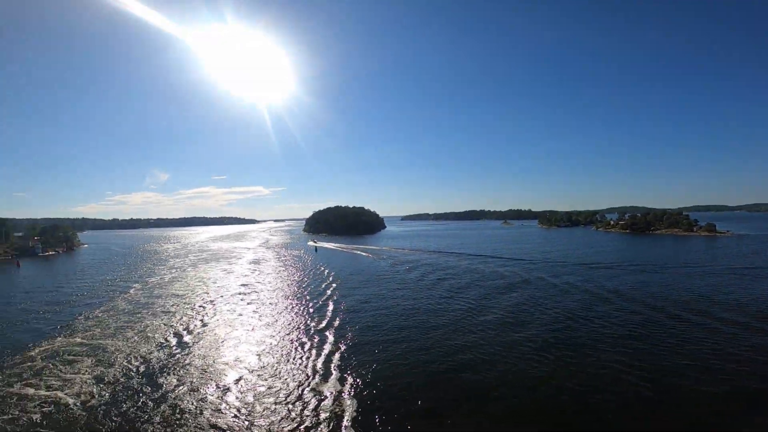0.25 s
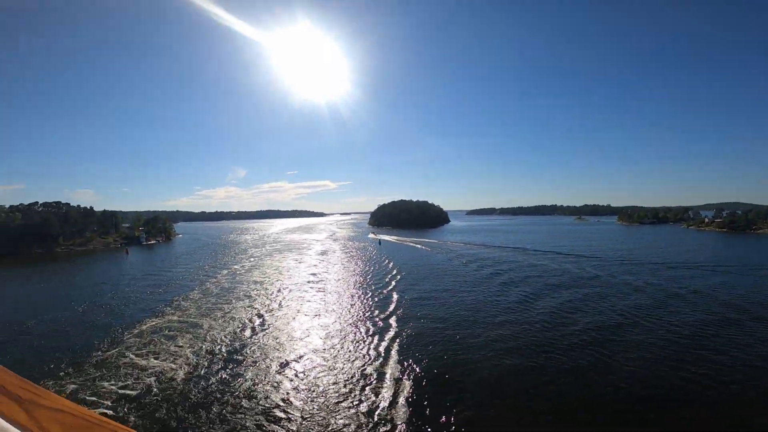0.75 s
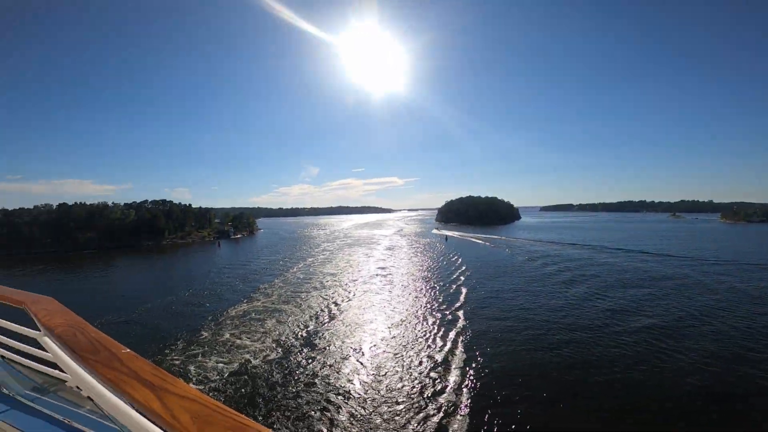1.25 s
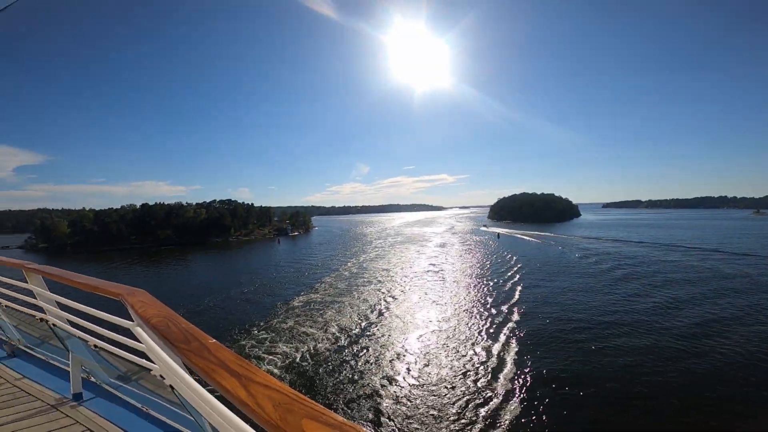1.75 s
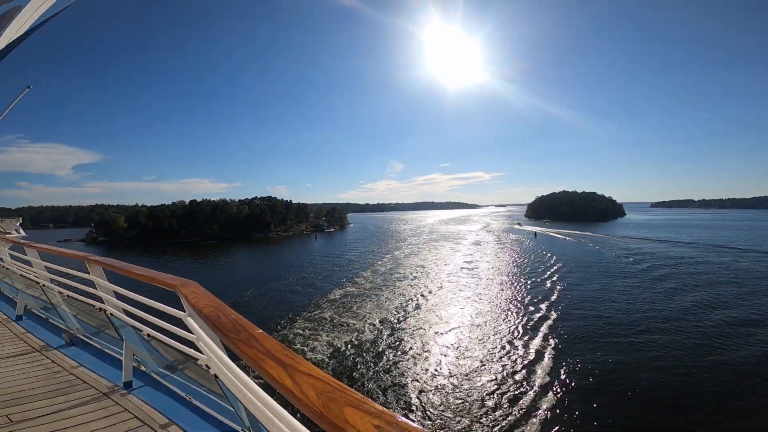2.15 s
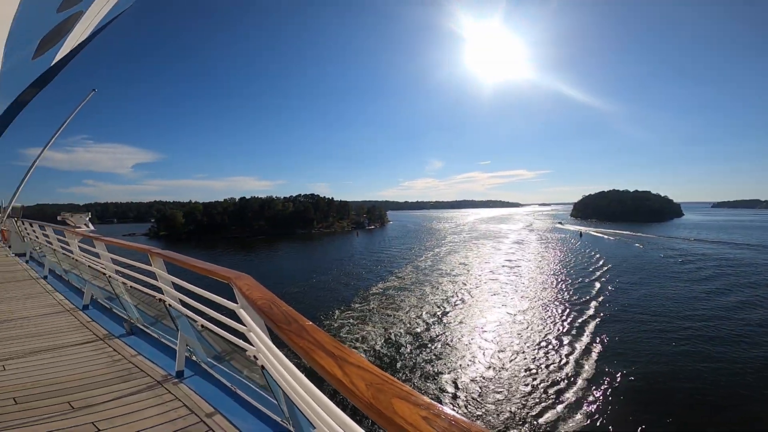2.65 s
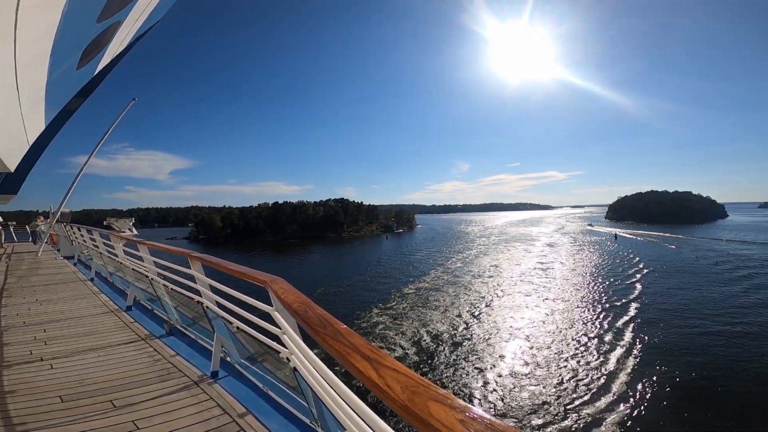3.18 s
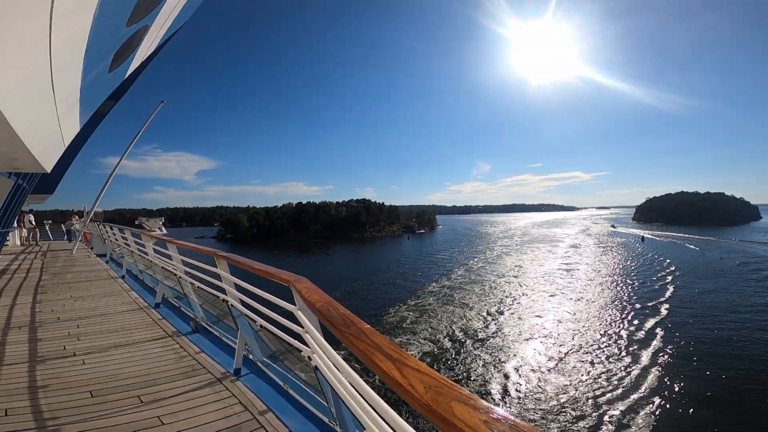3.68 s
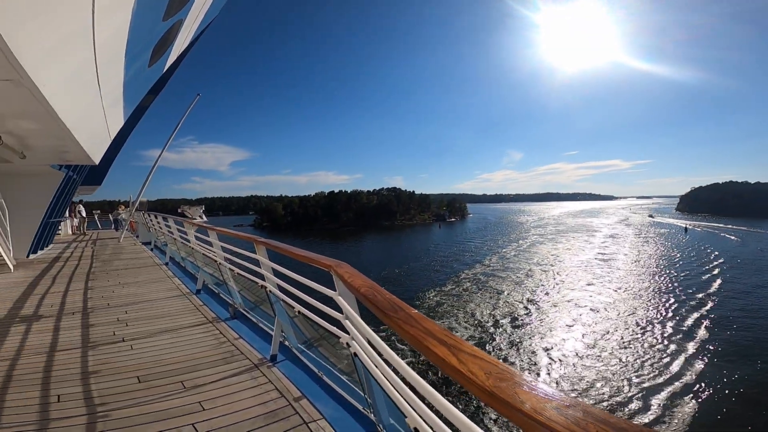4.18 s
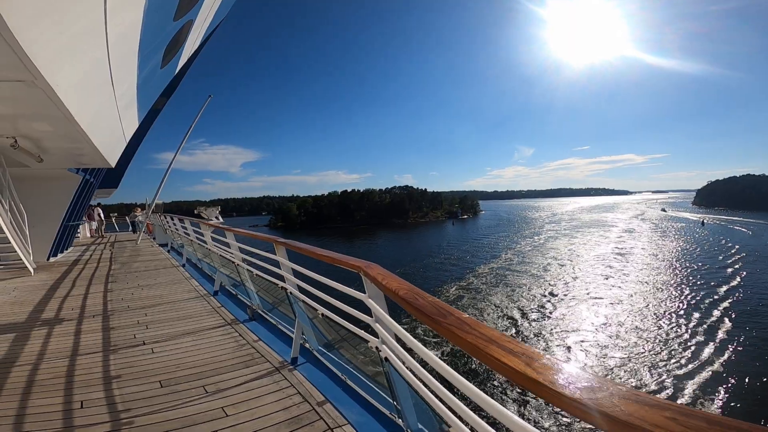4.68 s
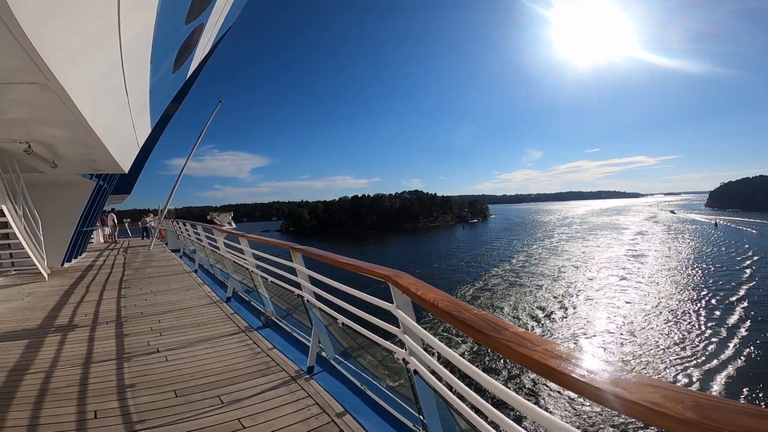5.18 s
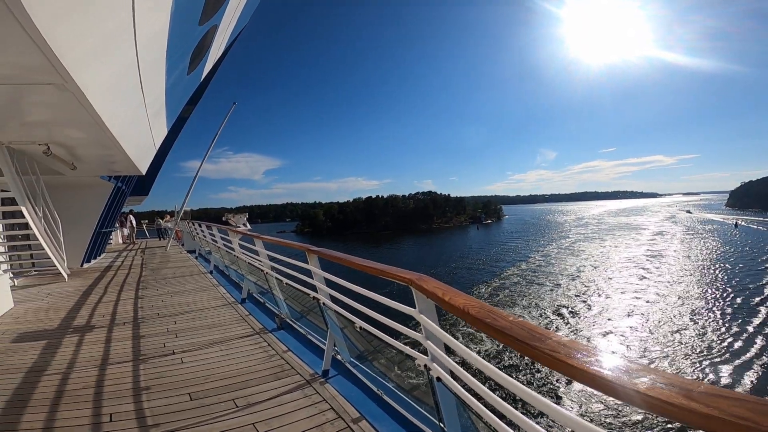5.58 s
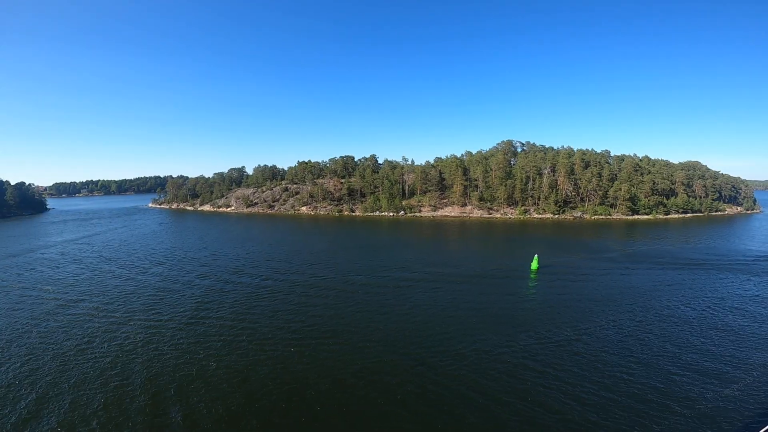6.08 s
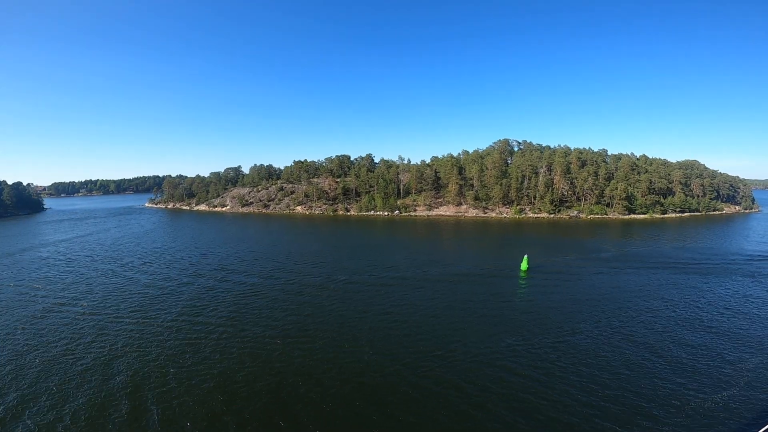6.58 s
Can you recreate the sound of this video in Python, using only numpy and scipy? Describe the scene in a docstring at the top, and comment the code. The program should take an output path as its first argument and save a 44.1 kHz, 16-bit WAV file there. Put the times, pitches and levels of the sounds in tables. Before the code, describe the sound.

Low, beating ship rumble under hissing wake and early wind thumps; after a short gap, a narrower, humming deck sound fades in.

```python
"""The open deck of a ship under way, heard from two places.
At the first, engines throb through the hull as a beating rumble and a wavering tone with a fainter drone.
A fan and a generator hum as steady tones, the wake rushes as filtered noise, and wind buffets the two ports.
After a short silence the second place fades in, in mono: nearer the generator and without the fan.
Brief soft hoots are heard at both places, and a faint double tick soon after the second begins."""
import sys
import numpy as np
from scipy import signal
from scipy.fft import rfft, irfft, next_fast_len
from scipy.io import wavfile
from scipy.ndimage import uniform_filter1d, minimum_filter1d

SR = 44100
rng = np.random.default_rng(int(sys.argv[2]) if len(sys.argv) > 2 else 0)


def dump(signal):
    """Clip the signal to [-1, 1] and save it as 16-bit WAV at the path in sys.argv[1]."""
    limited = np.clip(np.atleast_2d(signal).T, -1, 1)
    pcm = np.round(limited * 32767).astype(np.int16)
    wavfile.write(sys.argv[1], SR, pcm)


N = 301711

CUT_S, RESUME_S = 5.671, 5.889  # end of the first place, start of the second
SIZE = next_fast_len(N)
TIME = np.arange(N) / SR
HZ = np.maximum(np.arange(SIZE // 2 + 1) * SR / SIZE, 1)
AT_FIRST = TIME < RESUME_S


def from_db(db):
    """Turns decibels into gain."""
    return 10 ** (np.asarray(db) / 20)


def rms_one(x):
    """Scales a sound to rms 1."""
    return x / np.sqrt(np.mean(x ** 2) + 1e-20)


def in_time(places):
    """Joins the tables of both places and reads their columns at every sample."""
    s, *columns = np.vstack(places).T
    return [np.interp(TIME, s, column) for column in columns]


def at_hz(points):
    """Reads a (f/Hz, value) table at every spectral bin, on a logarithmic frequency scale."""
    hz, value = np.transpose(points)
    return np.interp(np.log(HZ), np.log(np.maximum(hz, 1)), value)


def drift(rate_hz):
    """Slow chance with spread 1: noise at every 40th sample, smoothed twice by a one-pole low-pass."""
    r = np.exp(-2 * np.pi * rate_hz * 40 / SR)
    noise = rng.standard_normal(N // 40 + 2002)
    slow = signal.lfilter([1], [1, -2 * r, r * r], noise)[2000:]  # drop the filter's start-up
    return np.interp(np.arange(N) / 40, np.arange(len(slow)), rms_one(slow))


def wavering(hz, wander_hz, rate_hz):
    """A sine of rms 1 whose pitch wanders at random around hz."""
    cycles = np.cumsum(hz + wander_hz * drift(rate_hz)) / SR
    return np.sqrt(2) * np.sin(2 * np.pi * (cycles + rng.random()))


def rush(spectrum, patchy_db, tilt_db=0):
    """Stereo noise of rms 1 in overlapping octave bands, each swelling partly together, partly alone."""
    # how alike left and right are: f/Hz, shared part of the power (0-1)
    likeness = [(60, 1), (100, 1), (170, 0.95), (280, 1), (460, 1), (770, 0.92), (1290, 1), (2140, 0.77),
                (3570, 0.72), (5000, 0.27), (5800, 0.79), (7500, .9), (9930, 0.94), (12000, 0.7)]
    # how far left runs ahead of right, minus = behind: f/Hz, phase/radians
    left_lead = [(60, 0.67), (300, -0.32), (780, -0.57), (1700, -0.66), (3450, -0.67), (5340, -0.59),
                 (5800, -0.1), (10100, 0.05)]
    # how much louder left is than right: f/Hz, difference/dB
    left_over_right = [(30, 1), (70, -0.5), (170, 1), (460, 2.5), (1290, 2.0), (3570, 3.5), (9930, -0.5)]
    common, left, right = rfft(rng.standard_normal((3, SIZE)))
    alike = np.clip(at_hz(likeness), 0, 1)
    pair = np.sqrt(alike) * common + np.sqrt(1 - alike) * np.array([left, right])
    # half the difference goes to each side
    turn = from_db(at_hz(left_over_right) / 2) * np.exp(.5j * at_hz(left_lead))
    pair = pair * from_db(at_hz(spectrum)) * np.array([turn, 1 / turn])
    together = drift(3.5)
    octave = np.log2(np.clip(HZ, 62.5, 8000) / 62.5)
    out = 0
    for band in range(8):
        window = np.clip(1 - abs(octave - band), 0, 1)
        swell_db = patchy_db * (0.29 * together + drift(16.0))
        gain = from_db(swell_db + tilt_db * (band - 3.5))
        out = out + gain * irfft(pair * window, SIZE)[:, :N]
    return rms_one(out)


def wake():
    """The rush of wake and air: low hull roar and higher hiss, coloured differently at the two places."""
    # one table per place: t/s, hull roar/dB (before 7 dB are added), hiss/dB, hiss brightening/(dB per octave)
    rush_levels = [
        [(0.0, -32.5, -41.5, 0), (.1, -35, -44.5, 0.9), (0.48, -34.5, -40.5, 0.14), (.75, -32.5, -43.5, 1.35),
         (1.3, -34, -42.5, 0.5), (1.65, -33, -42.5, 0.37), (2.05, -35, -41.5, 0.2), (2.8, -36, -43.5, 0.4),
         (3.2, -35, -43, 0), (4.0, -37, -43.5, 0.6), (4.3, -33.5, -41.5, 0.3), (4.56, -36, -43, 0.27),
         (5.2, -37, -43, 0.03), (5.66, -36, -43.5, -0.5)],
        [(5.93, -32, -44.5, -0.5), (6.03, -27.5, -40.5, -0.8), (6.08, -31, -40.5, -1), (6.14, -30, -40.5, -0.8),
         (6.26, -28, -40, -0.5), (6.4, -29, -42, 0), (6.5, -30, -42, -0.1), (6.55, -28, -43, 0.3),
         (6.84, -30, -44.5, -0.4)],
    ]
    # colour of the roar, one table per place: f/Hz, relative level/(dB per Hz)
    roar_colours = [
        [(12, -20.5), (25, -7), (50, 1), (63, 7.5), (86, 8), (99, -2), (112, -3), (132, -4), (160, -5.5),
         (210, -13), (232, -12), (245, -9), (262, -13), (320, -15.5), (333, -16.5), (348, -16.5), (460, -31),
         (700, -68), (3000, -120)],
        [(12, -11), (28, 11), (45, 9.5), (58, 10.5), (90, 8), (102, 1.5), (125, 3.5), (145, 1.5), (200, -4.5),
         (310, -13), (360, -12), (388, -6), (412, -12), (470, -14), (700, -77), (3000, -120)],
    ]
    # colour of the hiss, one table per place: f/Hz, relative level/(dB per Hz)
    hiss_colours = [
        [(200, -18), (350, -2.5), (450, -0.5), (700, -1.5), (870, -3.5), (915, -0.5), (1100, -3), (1600, -5.5),
         (2700, -10.5), (4500, -18), (7800, -30.5), (8800, -30.5), (10200, -37), (10800, -46), (12500, -46.5),
         (14000, -58), (15200, -74), (16000, -87.5)],
        [(200, -19), (350, -9.5), (470, -3.5), (700, -3), (850, -6.5), (1130, -8.5), (1400, -11), (1600, -13),
         (1900, -15.5), (3500, -22.5), (6000, -32.5), (10200, -49), (11200, -58), (16000, -84)],
    ]
    roar_db, hiss_db, tilt_db = in_time(rush_levels)
    roar_db = roar_db + 1 * drift(2.5) * AT_FIRST  # random swells of about 1 dB, first place only
    places = []
    for roar_colour, hiss_colour in zip(roar_colours, hiss_colours):
        roar = from_db(roar_db + 7.0) * rush(roar_colour, patchy_db=0.77)
        hiss = from_db(hiss_db) * rush(hiss_colour, patchy_db=0.8, tilt_db=tilt_db)
        places.append(roar + hiss)
    return np.where(AT_FIRST, *places)


def hoots_and_ticks():
    """Soft bell-shaped tones with gliding pitch, and two very short clicks of opposite sign."""
    # soft hoots, perhaps wind across the railing: middle t/s, f/Hz, peak level/dB, length/s, glide/(Hz per s)
    hoots = [(3.672, 538.2, -43.5, 0.066, -48), (5.265, 712, -45.5, 0.14, 27),
             (5.992, 922, -46.5, .07, -200), (6.158, 664, -46, 0.07, 49), (6.175, 705, -41, 0.07, -54),
             (6.191, 505.2, -41, 0.065, 301), (6.474, 557, -40, .1, -100)]
    # a faint double tick: t/s, peak level/dB
    ticks = [(6.053, -29.5), (6.0547, -35)]
    out = np.zeros(N)
    for s, hz, db, length_s, glide in hoots:
        t = TIME - s
        bell = np.exp(-(2 * t / length_s) ** 2)
        out += from_db(db) * bell * np.sin(2 * np.pi * (hz + glide * t / 2) * t)
    step = np.arange(12)
    for sign, (s, peak_db) in zip((1, -1), ticks):
        out[round(s * SR) + step] += sign * from_db(peak_db - 4.5 * step)  # fades 4.5 dB per sample
    return out


def wind():
    """Puffs of wind: each port makes its own low turbulence, which every puff lets through for a moment."""
    # the strongest puffs: middle t/s, level/dB (before 6 dB are added), share of power on the left port (0-1)
    strong = [(0.314, -24.5, 0.7), (0.433, -26, 0.3), (0.624, -28, 0), (0.748, -28.5, 0.51),
              (0.98, -36.5, 0.7), (1.085, -28.5, 0.6), (1.21, -35, 0.58), (1.342, -29, 0.9),
              (1.472, -29, 0.6), (1.62, -33, .5), (1.78, -32, 0.54), (1.88, -35.5, 0.6), (2.3, -38, 0.6),
              (2.44, -34, 0.41), (2.87, -33, 0.54), (2.97, -39.5, 0.5), (3.317, -39, 0.69),
              (3.83, -42, 0.54), (3.953, -35, 0.55), (4.102, -32, 0.6), (4.232, -28, 0.54),
              (5.02, -36, 0.48), (5.6, -43.5, .5)]
    # colour of the turbulence: f/Hz, relative level/(dB per Hz)
    puff_colour = [(12, -9), (25, 9.5), (45, 12.5), (80, 2), (100, 2.5), (140, 1.5), (280, -11.5),
                   (400, -24), (480, -20), (900, -65), (3000, -120)]
    puff_s = 0.043
    noise = rfft(rng.standard_normal((2, SIZE)))
    turbulence = rms_one(irfft(from_db(at_hz(puff_colour)) * noise, SIZE)[:, :N])
    # 22 weaker puffs at random moments of the first place, same columns
    weak = [(when * CUT_S, -43 - 0.5 * (4 * how - 2), left / 2 + 0.2)
            for when, how, left in rng.random(size=(22, 3))]
    power = np.zeros((2, N))
    for s, level_db, left in list(strong) + weak:
        share = np.clip([[left], [1 - left]], 0, 1)
        power += share * from_db(2 * level_db) * np.exp(-(2 * (TIME - s) / puff_s) ** 2)
    return from_db(6.0) * np.sqrt(power) * turbulence


def fan_and_generator():
    """Two steady machine tones with slightly wandering pitch and level; the fan only at the first place."""
    # one table per place: t/s, fan/dB, generator/dB
    hum_levels = [
        [(0.0, -41.5, -50.5), (.5, -37, -49), (.75, -40, -51.5), (1.35, -35.5, -51), (2.2, -38.5, -51),
         (2.5, -44.5, -52), (2.93, -40.5, -53.5), (3.7, -43, -50), (4.03, -39, -50), (4.3, -44.5, -55.5),
         (4.7, -39, -54), (5.1, -45, -50.5), (5.3, -48, -59.5), (5.66, -46.5, -49.5)],
        [(5.96, -45, -37.5), (6.15, -45, -35.5), (6.3, -45, -35), (6.45, -46, -34.5), (6.84, -45, -34)],
    ]
    fan_db, generator_db = in_time(hum_levels)
    fan = from_db(fan_db + 1 * drift(1.2)) * wavering(177.9, 0.25, 2.0) * AT_FIRST
    flicker_db = np.where(AT_FIRST, 1.2, 0)  # the generator's level flickers only at the first place
    generator = from_db(generator_db + flicker_db * drift(10.0)) * wavering(398.9, 0.16, 4.1)
    return fan, generator


def swelling(swells, between_db, wander_hz):
    """A wandering tone that glides in pitch from swell to swell and sinks in level between them."""
    edge_s, flicker_db = 0.087, 1.5
    s, length_s, hz, level_db = np.transpose(swells)[:, :, None]
    past_edge = 4 * (abs(TIME - s) - length_s / 2) / edge_s
    shape = 1 / (1 + np.exp(np.clip(past_edge, -30, 30)))
    gain = from_db(between_db) + np.sum(from_db(level_db) * shape, axis=0)
    pitch = np.interp(TIME, s[:, 0], hz[:, 0])
    return gain * from_db(flicker_db * drift(9.8)) * wavering(pitch, wander_hz, 10.8)


def hull_rumble():
    """A wandering low tone that beats against weaker neighbours, with its loudness partly evened out."""
    # one table per place: t/s, level/dB
    rumble_levels = [
        [(0.0, -27.5), (0.09, -18.5), (0.44, -20), (1.58, -20), (1.61, -33), (1.87, -15.5), (1.97, -21),
         (2.24, -22.5), (2.27, -14.5), (2.68, -21.5), (2.73, -26), (2.81, -9), (2.88, -31.5), (2.98, -13),
         (3.15, -22), (3.2, -17.5), (3.45, -24.5), (3.48, -15), (3.55, -22.5), (4.27, -17.5), (4.46, -21),
         (4.65, -13), (4.7, -23), (4.96, -16), (5.0, -25), (5.14, -12.5), (5.22, -24), (5.34, -14.5),
         (5.63, -23.5), (5.66, -42.5)],
        [(5.96, -26), (6.02, -21), (6.08, -29.5), (6.19, -22), (6.29, -26), (6.35, -28), (6.4, -23),
         (6.44, -29), (6.53, -22.5), (6.67, -26), (6.74, -19.5), (6.79, -32), (6.84, -12)],
    ]
    # one table per place: t/s, f/Hz
    rumble_pitch = [
        [(0.0, 38.87), (0.36, 36.74), (0.72, 40.8), (0.85, 36.2), (0.98, 39.9), (1.32, 38.3), (1.42, 44.65),
         (1.62, 41.96), (1.72, 35.3), (1.86, 37.94), (2.03, 30.05), (2.22, 38.82), (2.79, 42.27), (3.39, 34.05),
         (3.62, 34.68), (3.77, 29.9), (4.0, 30.2), (4.11, 34.13), (4.59, 34.64), (4.73, 38.76), (5.01, 35),
         (5.66, 38.84)],
        [(5.96, 33.15), (6.06, 33.22), (6.088, 32.55), (6.146, 31.3), (6.174, 30.6), (6.386, 30.7),
         (6.468, 28.93), (6.732, 29.07), (6.812, 27.48), (6.83, 27.6)],
    ]
    # weaker tones around it: f/Hz, level beside the main tone/dB at the first place, same/dB at the second
    neighbours = [(44.63, -5.5, -15), (34.7, -6.5, -16.5), (26.86, -4.5, -9)]
    rumble_db, = in_time(rumble_levels)
    rumble_hz, = in_time(rumble_pitch)
    beating = wavering(rumble_hz, 1.24, 9.4)
    for hz, first_db, second_db in neighbours:
        beating = beating + from_db(np.where(AT_FIRST, first_db, second_db)) * wavering(hz, 2.2, 6.63)
    beat_depth = 0.1  # the more, the deeper the rumble beats
    evened = beating / np.sqrt(uniform_filter1d(beating ** 2, size=SR // 14) + beat_depth)
    return from_db(rumble_db) * rms_one(evened)


def engines():
    """Engine throb through the hull (rumble, tone and drone) with the two machine hums, placed in stereo."""
    # swells of the engine tone: middle t/s, length/s, f/Hz, level/dB
    tone_swells = [(0.114, 0.11, 72, -27), (0.6, 0.23, 72.62, -25.5), (1.05, 0.5, 72.9, -26),
                   (1.748, 0.14, 73.25, -23), (2.069, 0.34, 74.12, -22), (2.638, 0.31, 73.54, -21.5),
                   (3.326, 0.23, 74.2, -18), (3.761, 0.27, 72.8, -18), (4.188, 0.16, 73.8, -29),
                   (4.447, 0.26, 76.33, -21), (4.83, 0.11, 76.1, -18.5), (5.04, 0.11, 73.6, -21.5),
                   (5.23, 0.12, 76.1, -24.5), (5.481, 0.13, 74.24, -31.5), (5.97, 0.057, 65.9, -39.5),
                   (6.09, 0.11, 57.25, -23), (6.25, 0.024, 57.75, -28.5), (6.35, .08, 65.87, -25),
                   (6.49, 0.19, 77.84, -21.5), (6.79, 0.047, 79.4, -26.5)]
    # swells of the fainter hull drone: middle t/s, length/s, f/Hz, level/dB
    drone_swells = [(.1, 0.12, 125.7, -37), (.4, 0.24, 125, -42), (.85, 0.28, 123.5, -36),
                    (1.2, 0.14, 138.1, -49), (1.55, 0.073, 133.3, -39), (1.76, 0.082, 129.7, -40),
                    (2.15, 0.3, 127, -37.5), (2.44, 0.059, 125.7, -36), (3.1, 0.099, 129.5, -35),
                    (3.48, 0.097, 138.5, -46), (3.75, 0.23, 131.2, -42.5), (4.27, 0.23, 130.6, -33.5),
                    (4.58, 0.043, 139.7, -33.5), (4.93, .15, 138.4, -39), (5.25, 0.17, 131.9, -37.5),
                    (5.63, 0.078, 130.8, -34), (5.96, 0.088, 142.7, -35), (6.04, 0.064, 129.2, -26),
                    (6.22, 0.059, 141.3, -28), (6.4, 0.053, 142.3, -46), (6.54, 0.081, 136.9, -30.5),
                    (6.7, 0.07, 144.2, -34)]
    tone = swelling(tone_swells, -36.5, np.where(AT_FIRST, 1.18, 2.18))
    drone = swelling(drone_swells, -57.5, 3.1)
    parts = (hull_rumble(), tone, drone, *fan_and_generator())
    left_over_right_db = (2.1, 1.1, 1.0, .8, 4.6)  # in the order of the parts
    return sum(part * from_db([[db / 2], [-db / 2]]) for part, db in zip(parts, left_over_right_db))


def scene():
    """The whole deck: stereo at the first place, mono at the second."""
    deck = wake() + hoots_and_ticks() + wind() + engines()
    return np.where(AT_FIRST, deck, deck.mean(axis=0))


def record(dry):
    """Ducks just after loud throbs, limits peaks, cuts lows and highs, and joins the places across a silence."""
    ratio, knee_db, lag_s = 0.19, -19, 0.043
    r = np.exp(-1 / (lag_s * SR))
    power = signal.lfilter([1 - r], [1, -r], np.mean(dry ** 2, axis=0), zi=[from_db(2 * knee_db)])[0]
    over_db = np.maximum(10 * np.log10(power + 1e-12) - knee_db, -2.5)  # quiet moments rise a little
    low_cut = signal.butter(3, 21.4, "high", fs=SR, output="sos")
    level = signal.sosfilt(low_cut, dry * from_db(-ratio * over_db))
    limit, hold = .355, int(.012 * SR)  # peak, samples
    room = limit / np.maximum(abs(level).max(axis=0), limit)
    level = level * uniform_filter1d(minimum_filter1d(room, size=hold), size=hold)
    fade_out_s, fade_in_s = .006, .058
    fade_out = np.clip((CUT_S - TIME) / fade_out_s, 0, 1)
    fade_in = np.clip((TIME - RESUME_S) / fade_in_s, 0, 1) ** 1.3
    high_cut = signal.cheby2(12, 70, 16600, fs=SR, output="sos")
    return signal.sosfilt(high_cut, level * (fade_out + fade_in))


dry = scene()
out = record(dry)
dump(out)
```